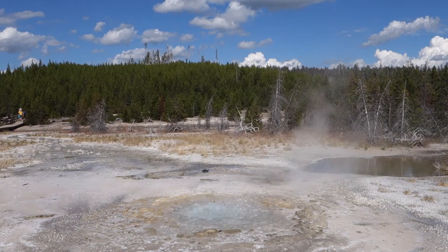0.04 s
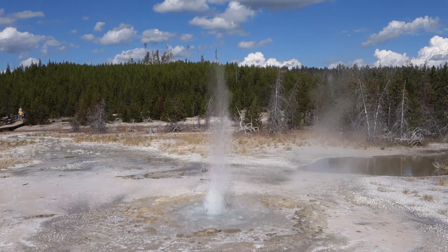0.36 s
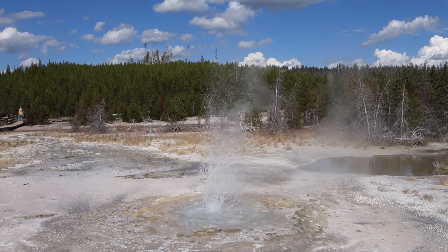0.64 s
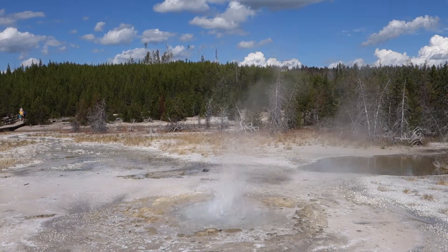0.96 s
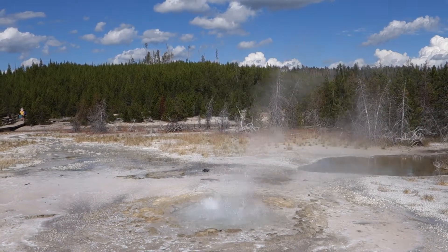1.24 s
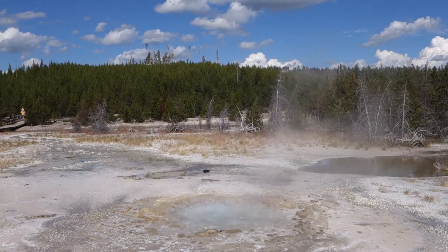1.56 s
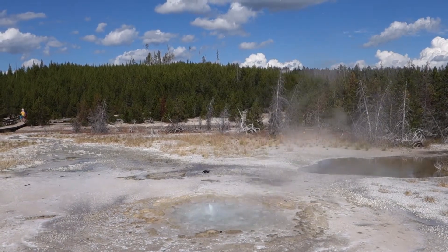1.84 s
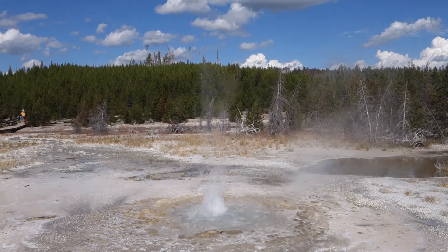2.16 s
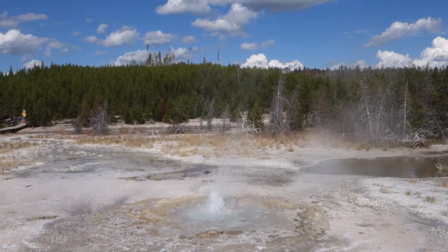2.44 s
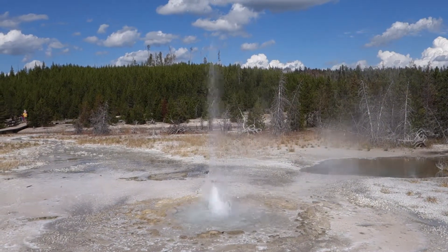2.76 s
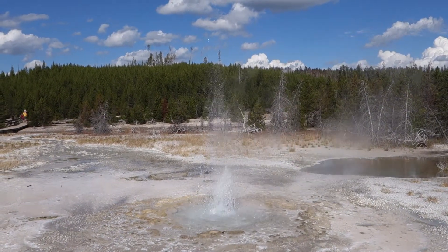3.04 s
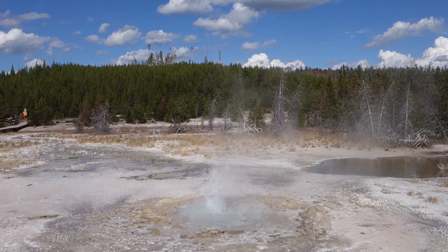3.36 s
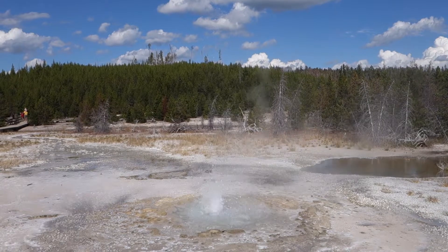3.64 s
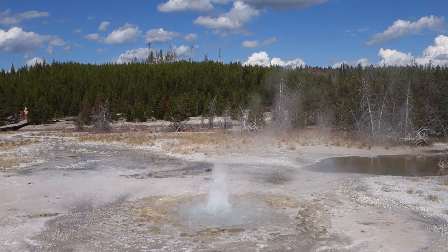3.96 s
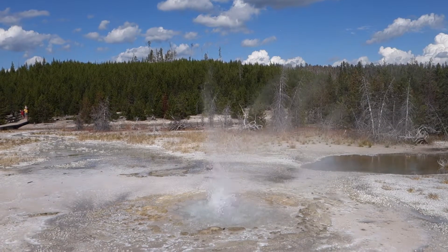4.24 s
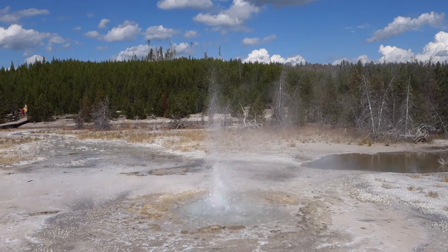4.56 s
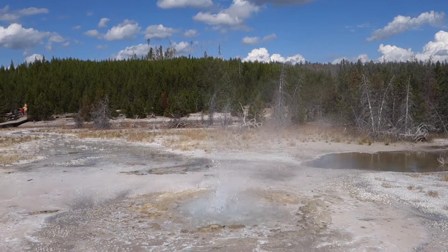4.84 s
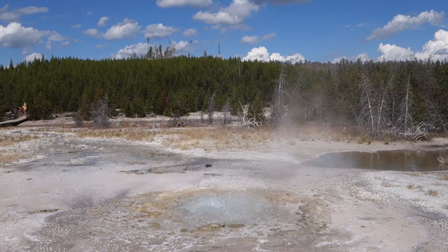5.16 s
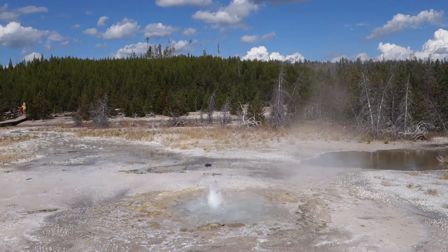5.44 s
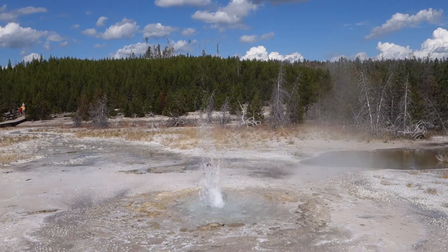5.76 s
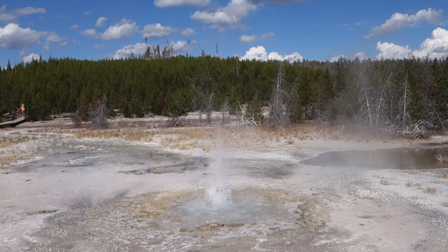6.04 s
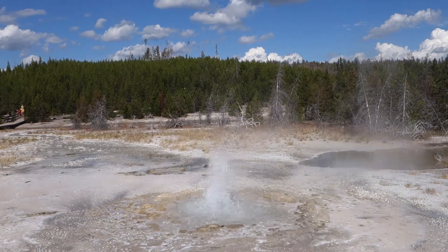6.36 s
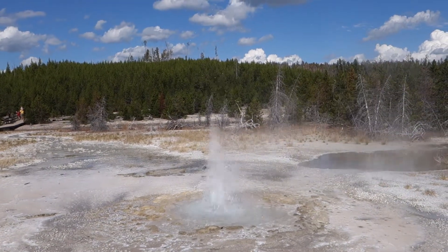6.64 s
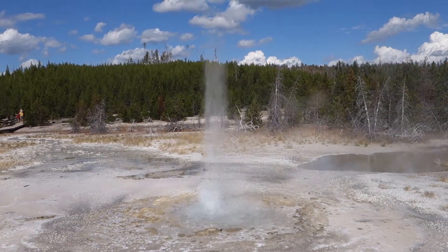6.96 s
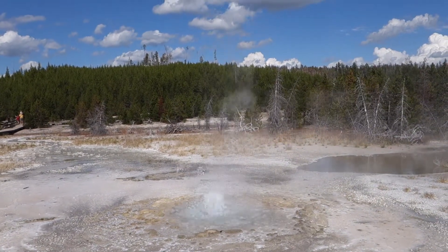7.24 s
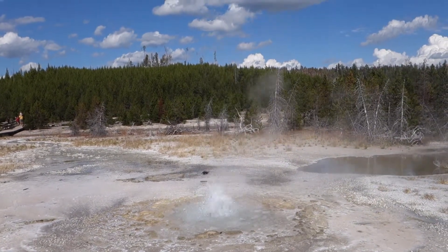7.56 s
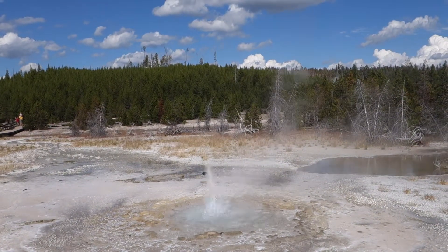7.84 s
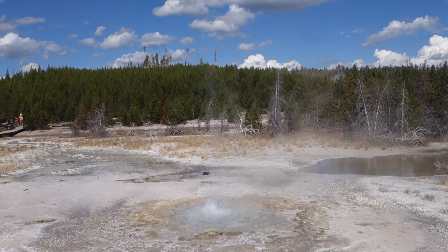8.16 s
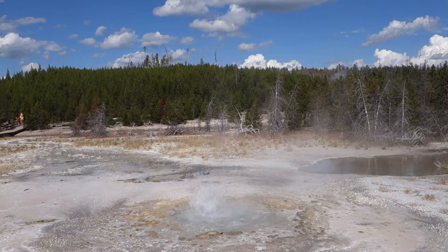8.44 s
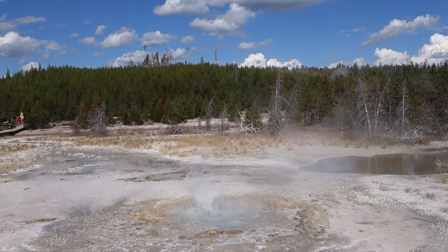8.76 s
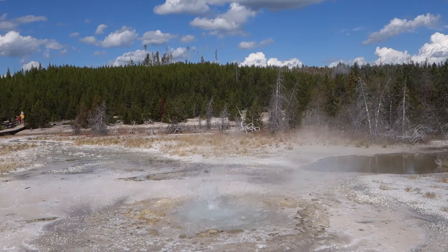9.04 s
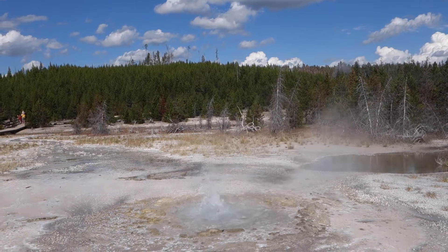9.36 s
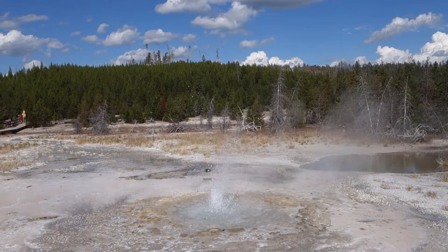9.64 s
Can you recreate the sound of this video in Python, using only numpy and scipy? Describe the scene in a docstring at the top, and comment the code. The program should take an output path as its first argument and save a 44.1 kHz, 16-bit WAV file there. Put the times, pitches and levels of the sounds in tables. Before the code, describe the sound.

A small geyser spurts from a simmering pool across an open, flat basin. Its water falls back in one short shower after another, splashing and pattering with a slightly hollow tone, with scattered plops and a few drops ticking close by. Low wind rumble buffets the microphone at the start, eases briefly, blows hardest through the middle and weakens near the end.

```python
"""Small geyser in the wind

Across an open sinter basin a small geyser spurts from its simmering pool. Thrown water slaps back,
bubbles and patters on the crust; the hard flat ground mirrors every splash a moment later, which gives
it a hollow colour. Single drops land nearer, and wind buffets both ports of the stereo microphone."""
import sys
import numpy as np
from scipy import signal
from scipy.fft import rfft, irfft
from scipy.io import wavfile
from scipy.ndimage import uniform_filter1d

SR = 44100
rng = np.random.default_rng(int(sys.argv[2]) if len(sys.argv) > 2 else 0)


def transcribe(signal):
    """Save signal, clipped to [-1, 1], as a 16-bit WAV file at the path in sys.argv[1]."""
    frames = np.atleast_2d(signal).T
    limited = np.clip(frames, -1, 1)
    pcm = np.round(limited * 32767).astype(np.int16)
    wavfile.write(sys.argv[1], SR, pcm)


N = 436590
TIME, FREQ = np.arange(N) / SR, np.fft.rfftfreq(N, 1 / SR)


def gain_of(db):
    """Decibels to amplitude."""
    return 10 ** (np.asarray(db) / 20)


def unit_rms(x):
    """Scales to rms 1."""
    return x / np.sqrt(np.mean(x ** 2) + 1e-20)


def curve(table, column=1):
    """One column of a table, interpolated onto FREQ over log frequency."""
    columns = np.transpose(table)
    return np.interp(np.log(FREQ + 1), np.log(columns[0] + 1), columns[column])


def filtered(x, response):
    """Filters by a response given on FREQ."""
    return irfft(rfft(x) * response, N)


def wander(hz):
    """Smooth random drift of rms 1, no faster than about hz."""
    return unit_rms(filtered(rng.standard_normal(N), np.exp(-(FREQ / hz) ** 2)))


def band(centres_hz, index):
    """One of a set of overlapping bands that sum to 1."""
    return np.interp(np.log(FREQ + 1), np.log(centres_hz), np.eye(len(centres_hz))[index])


def add(mix, start_s, sound):
    """Mixes a sound in at start_s."""
    part = mix[max(round(start_s * SR), 0):][:len(sound)]
    part += sound[:len(part)]


def steadied(x, low_hz, high_hz, window=4000):
    """Scales x so that one band of it stays at rms 1 over a sliding window of samples."""
    inside = filtered(np.atleast_2d(x).mean(0), (FREQ > low_hz) & (FREQ < high_hz))
    return x / np.sqrt(np.abs(uniform_filter1d(inside ** 2, window)) + 1e-12)


def bursts(rows, rise_s, fall_db_per_s):
    """Power over time of events that rise quickly, hold and die away."""
    power, t = np.zeros(N + SR), np.arange(2 * SR) / SR
    for start_s, hold_s, db in rows:
        age = t + max(-start_s, 0)
        attack = np.minimum(age / rise_s, 1)
        fall_db = fall_db_per_s * np.maximum(age - hold_s, 0)
        add(power, start_s, (attack * gain_of(db - fall_db)) ** 2)
    return power[:N]


def grains(low_hz, high_hz, per_s, cycles, spread_db, glide, pitches=24):
    """Tiny damped rings of random time and size; each falls to 1/e in the given cycles."""
    out, t = np.zeros(N), np.arange(900) / SR
    for hz in np.geomspace(low_hz, high_hz, pitches):
        age = t * hz / cycles
        ring = np.exp(-age) * np.sin(2 * np.pi * cycles * age * (1 + glide * np.minimum(age, 4)))
        size = gain_of(spread_db * np.minimum(rng.exponential(1, N), 4.5)) * rng.choice([-1, 1], N)
        hits = size * (rng.random(N) < per_s / pitches / SR)
        out += np.sqrt(hz) * unit_rms(signal.oaconvolve(hits, ring)[:N])  # even power per Hz
    return unit_rms(out)


# Breeze over the open basin, at the microphone: (time [s], level [dB])
BREEZE_LEVELS = [(0.0, -19.5), (0.6, -47), (1.6, -51), (1.9, -27.5), (3.0, -33.5), (3.4, -24.5),
                 (5.6, -21.5), (6.5, -24.5), (8.0, -24.5), (8.35, -35.5), (9.9, -31.5)]
# Gusts catching the microphone: (start [s], hold [s], level [dB])
MIC_GUSTS = [(-0.04, 0.063, -20), (0.18, 0.063, -19), (0.26, 0.24, -27), (0.66, 0.044, -33.0),
             (0.77, 0.17, -30.5), (0.97, 0.067, -28.5), (1.11, 0.023, -29), (1.31, 0.057, -29.5),
             (1.69, 0.21, -26.5), (2.01, 0.05, -23.5), (2.18, 0.33, -28.5), (2.53, 0.29, -22.5),
             (3.06, 0.073, -21), (3.2, 0.25, -18.5), (3.48, 0.091, -21.0), (3.65, 0.11, -21),
             (3.89, 0.04, -18.5), (4.01, 0.23, -17), (4.36, 0.39, -19.5), (4.81, 0.07, -20.5),
             (5.02, 0.077, -21.5), (5.25, 0.31, -19.5), (5.65, 0.38, -21.5), (6.04, 0.23, -23),
             (6.55, 0.15, -29.5), (6.79, 0.24, -23.0), (7.28, 0.5, -21), (7.85, 0.23, -23.5),
             (8.18, 0.057, -21), (8.35, 0.17, -25.5), (8.56, 0.24, -25.5), (8.91, 0.1, -35),
             (9.19, 0.13, -29), (9.54, 0.15, -28)]
def wind_strength(sway_db=0.9):
    """Buffeting in dB: gusts stand on the breeze, and the whole flow sways unsteadily."""
    breeze = gain_of(np.interp(TIME, *np.transpose(BREEZE_LEVELS))) ** 2
    gusts = bursts(MIC_GUSTS, rise_s=0.026, fall_db_per_s=183)
    return 10 * np.log10(breeze + gusts) + sway_db * wander(hz=12)


# Wind right on the microphone: (frequency [Hz], relative density [dB])
WIND_SPECTRUM = [(15, -32), (25, -27), (45, -9), (70, -3.5), (105, 1.5), (165, -1), (250, -7), (380, -17.5),
                 (550, -26.5), (900, -45), (2000, -72)]
# How alike it is at the two ports: (frequency [Hz], coherence [0-1], left lead [rad])
WIND_COHERENCE = [(50, 1, -0.51), (144, 0.82, 0.1), (276, 0.57, -0.34), (497, 0.6, -1.74)]
def wind(brisk_db=-22, flutter_at_brisk_db=-34, flutter_growth=1.83, rumble_growth=0.5):
    """Eddies at the two ports: a deep rumble and a buffeting follow the gusts, small ones flutter."""
    left, unrelated = rng.standard_normal((2, N))
    coherence = np.clip(curve(WIND_COHERENCE), 0, 1)
    right = filtered(left, coherence * np.exp(-1j * curve(WIND_COHERENCE, column=2)))
    right += filtered(unrelated, np.sqrt(1 - coherence ** 2))
    flow = filtered(np.array([left, right]), gain_of(curve(WIND_SPECTRUM)))
    lumps_db = wander(hz=45)
    small_lumps_db = 3.5 * (lumps_db + wander(hz=45)) / np.sqrt(2)
    large_eddies = steadied(flow * gain_of(lumps_db), 30, 400)
    small_eddies = steadied(flow * gain_of(small_lumps_db), 280, 520, window=9000)
    # the largest eddies swell less than the gust itself; the smallest swell more, and come and go
    gust_db = wind_strength()
    rumble_db = gust_db.mean() + rumble_growth * (gust_db - gust_db.mean())
    flutter_db = flutter_at_brisk_db + flutter_growth * (gust_db - brisk_db) + 2 * wander(hz=12)
    deep, low, mid, high = (band([61, 130, 245, 378], k) for k in range(4))
    rumble = filtered(large_eddies, deep) * gain_of(rumble_db)
    buffet = filtered(large_eddies, low + mid / 2) * gain_of(gust_db)
    flutter = filtered(small_eddies, mid / 2 + high) * gain_of(flutter_db)
    return rumble + buffet + flutter


# Single eddies striking the microphone: (time [s], relative level [dB], centre [Hz])
EDDY_THUMPS = [(0.082, -6, 149), (1.734, -11.5, 109), (1.844, -6.5, 107), (1.907, -17, 220),
               (2.042, -12, 201), (2.22, -8.5, 151), (3.258, -12.5, 150), (3.361, -7, 150),
               (4.56, -11, 200), (3.75, -16, 260), (4.854, -7.5, 130), (5.32, -15, 150), (7.317, -23, 130),
               (7.605, -5, 267), (9.016, -15, 100), (9.227, -11, 130)]
def thumps(level_db=-3.5, cycles=0.64, phase_spread_rad=0.32):
    """One eddy crossing the ports is a pressure swing of a cycle or two, a little different at each."""
    out, t = np.zeros((2, N)), np.arange(-1200, 1200) / SR
    for time_s, db, hz in EDDY_THUMPS:
        phase, *port_offsets = rng.standard_normal(3)
        envelope = gain_of(db + level_db) * np.exp(-(t * hz / cycles) ** 2)
        for channel, offset in zip(out, port_offsets):
            swing = np.cos(2 * np.pi * (hz * t + phase) + phase_spread_rad * offset)
            add(channel, time_s + t[0], envelope * swing)
    return out


def simmer(level_db=-54.0):
    """Large bubbles keep up a low gurgle in the pool."""
    gurgle = grains(180, 607, per_s=580, cycles=3.8, spread_db=7.0, glide=0.0079, pitches=10)
    return gain_of(level_db) * gurgle


# Stray droplets landing close to the microphone: (time [s], relative peak [dB], centre [Hz])
NEAR_DROPS = [(1.4645, -14, 8500), (1.576, -24, 6500), (1.651, -21, 8000), (1.705, -22, 5500),
              (1.76, -23, 8000), (1.8697, -22.5, 6000), (3.764, -24, 4170), (4.3117, -15, 5340),
              (5.3406, -18.5, 3360), (5.4175, -19.5, 5340), (5.7396, -20.5, 8100), (5.9182, -24, 6500),
              (6.769, -19, 6000), (6.88, -19, 5900), (7.8714, -22, 4000), (8.312, -25, 8100),
              (9.1515, -22, 7640), (9.5535, -16, 4850)]
def drops(level_db=4.5, splatter=0.086, splatter_s=0.0085, cycles=0.48, pan_spread=0.24):
    """Each droplet is one sharp tick with a short splatter behind it, a little left or right."""
    out, t = np.zeros((2, N)), np.arange(800) / SR
    for time_s, db, hz in NEAR_DROPS:
        impact = (t == 0) + splatter * rng.standard_normal(len(t)) * gain_of(-60 * t / splatter_s)
        ring = np.exp(-t * hz / cycles) * np.sin(2 * np.pi * hz * t)
        tick = signal.fftconvolve(impact, ring)[:len(t)]
        tick *= gain_of(db + level_db) / abs(tick).max()
        pan = pan_spread * rng.standard_normal()
        add(out[0], time_s, (1 + pan) * tick)
        add(out[1], time_s, (1 - pan) * tick)
    return out


# Bounce off the flat ground between pool and microphone: (frequency [Hz], reflection [factor])
GROUND_MIRROR = [(300, 0.2), (1600, 0.75), (2600, 0.27), (4000, 0.37), (6000, 0.077), (10000, 0.022)]
# Scatter from the crust all around: (frequency [Hz], level re direct [dB])
CRUST_SCATTER = [(300, -23), (1200, -9), (2600, -8.5), (5500, -4.5), (11000, -1)]
def basin(x, ground_delay_s=0.001534, height_sway=0.011, scatter_s=0.044, patches=6):
    """Direct sound, its mirror image in the flat ground, and a short scatter off the rough crust."""
    mirror = np.clip(curve(GROUND_MIRROR), 0, 1)
    delay_s = ground_delay_s * (1 + height_sway * wander(hz=13.4))  # splashes sit higher or lower
    image = np.interp(TIME - delay_s, TIME, filtered(x, mirror))
    hollow = filtered(x + image, 1 / np.sqrt(1 + mirror ** 2))
    # each moment's water lands on another patch, with its own scatter paths
    t = np.arange(3000) / SR
    tails = rng.standard_normal((patches, 2, len(t))) * gain_of(-60 * t / scatter_s)
    tails /= np.linalg.norm(tails, axis=2, keepdims=True)
    shares = np.array([wander(hz=36) for _ in tails])
    shares /= np.linalg.norm(shares, axis=0)
    feeds = shares * (hollow + x) / 2
    scattered = sum(signal.oaconvolve(feed[None], tail, axes=1) for feed, tail in zip(feeds, tails))
    return hollow + filtered(scattered[:, :N], gain_of(curve(CRUST_SCATTER)))


# The geyser at the two microphone ports: (frequency [Hz], left minus right [dB], left lead [rad])
PORT_SHADING = [(610, 0.5, -0.13), (2160, 0.5, 0.36), (2940, -1, -1.18), (3340, -4.5, 0.059),
                (5400, -1.5, 0.019), (6500, 2, -0.13), (8800, 2, 0.0094), (11000, 1.5, -0.61)]
def ports(x):
    """The housing shades and delays each microphone port differently."""
    side = np.array([[0.5], [-0.5]])
    shade = gain_of(side * curve(PORT_SHADING))
    phase = side * curve(PORT_SHADING, column=2)
    return filtered(x, shade * np.exp(1j * phase))


# Lumps of water hitting the pool across the basin:
# (time [s], level [dB], cavity pitch [Hz], spatter re ring [factor])
POOL_SLAPS = [(0.037, -25.5, 740, .8), (.6505, -21, 740, 0.44), (0.776, -25.5, 1330, .6),
              (1.0125, -24, 3020, 1), (1.1692, -22, 2530, 0.65), (1.5266, -24.5, 2300, .8),
              (2.39, -23.5, 740, .4), (2.5385, -22.5, 720, .4), (4.0648, -26, 725, .5),
              (4.1535, -25, 720, .5), (4.41, -24.5, 1250, 0.35), (4.581, -17.5, 1260, 0.32),
              (5.127, -27, 3140, 0.95), (5.2195, -22.5, 706, .6), (6.2188, -27, 2750, .6),
              (6.297, -16, 750, 0.36), (8.312, -27.5, 1300, .8), (8.672, -22, 740, 0.43),
              (8.707, -24.5, 746, 0.37), (9.4642, -30.5, 1350, 0.94), (9.554, -25, 730, .4)]
def slaps(ring_s=0.015, spatter_s=0.022, glide_per_s=3.6):
    """A lump of water opens a cavity that rings briefly upward, inside a short burst of spatter."""
    out, t = np.zeros(N), np.arange(3000) / SR
    for time_s, db, hz, spatter_gain in POOL_SLAPS:
        cavity = np.sin(2 * np.pi * hz * t * (1 + glide_per_s * t)) * gain_of(-60 * t / ring_s)
        bandpass = signal.butter(2, [550, hz + 1000], "band", fs=SR, output="sos")
        fizz = unit_rms(signal.sosfilt(bandpass, rng.standard_normal(len(t))))
        spatter = spatter_gain * fizz * gain_of(-60 * t / spatter_s)
        add(out, time_s, gain_of(db) * (cavity + spatter))
    return out


# The vent across the basin heaves up slugs of water: (start [s], hold [s], gulp level [dB])
VENT_SPURTS = [(0.23, 0.13, -39), (0.65, 0.059, -35), (0.94, 0.06, -37), (2.38, 0.03, -33.5),
               (2.55, 0.06, -39), (2.83, 0.07, -38), (4.38, 0.14, -41), (4.68, 0.087, -39.5),
               (5.19, 0.051, -39), (5.41, -0.0, -36), (5.72, 0.08, -37.5), (6.26, 0, -30.5),
               (6.88, 0.074, -38), (7.04, 0.18, -39), (7.41, 0.096, -36.5), (7.82, 0.039, -36.5),
               (8.64, 0.13, -40.5), (9.52, 0.13, -39.5)]
# Thrown water raining back on pool and crust:
# (start [s], length [s], splash level [dB], heavy water re splash [dB], spray re splash [dB])
FALLING_SHOWERS = [(-0.11, 0.49, -42, -0.5, -7.5), (0.364, 0.61, -50, 8.5, -3.5),
                   (0.766, 0.7, -38, 1, -5.5), (1.052, 0.79, -43.5, -0.5, -3.5), (1.822, 0.36, -47, 4, 1),
                   (2.1, 0.85, -43, 4, -5.5), (2.811, 0.61, -40, 2, -4.5), (3.37, 0.77, -40, 1.5, -8),
                   (3.848, 1.11, -44, 4.5, -4.5), (4.686, 0.6, -39, -2.5, -7.5), (5.158, 0.62, -48, 7, -5),
                   (5.692, 0.45, -47, 6, -2.5), (5.967, 0.95, -38, 2, -6), (6.745, 0.37, -39.5, 2.5, -4.5),
                   (7.057, 0.93, -39.5, 0.5, -5), (7.622, 0.55, -41, 1.5, -9.5),
                   (8.182, 0.4, -45.5, 3, -8.5), (8.57, 0.43, -43.5, 0.5, -5.5),
                   (8.997, 0.42, -45.5, 4, -5), (9.25, 0.69, -45.5, 0, -4.5)]
# The pool's constant seething: (heavy water [dB], splash [dB], spray [dB])
POOL_SEETHE = (-50.5, -52.5, -60.5)
def water_levels(splash_re_gulp_db=-12, spray_re_gulp_db=-18, arch_exponent=0.93, surge_db=0.86):
    """Amplitudes of heavy water, splash and spray: spurts gulp, showers swell and thin in an arch."""
    jet = bursts(VENT_SPURTS, rise_s=0.024, fall_db_per_s=154)
    power = np.outer(gain_of([0, splash_re_gulp_db, spray_re_gulp_db]) ** 2, jet)
    power += gain_of(POOL_SEETHE)[:, None] ** 2
    for start_s, length_s, db, heavy_db, spray_db in FALLING_SHOWERS:
        age = np.arange(max(-start_s, 0), length_s, 1 / SR)
        arch = np.abs(np.sin(np.pi * age / length_s)) ** arch_exponent
        for layer, layer_db in zip(power, (db + heavy_db, db, db + spray_db)):
            add(layer, start_s, arch * gain_of(layer_db) ** 2)
    return np.sqrt(power) * gain_of(surge_db * wander(hz=9))


def clumps(per_s, fall_s):
    """Level swings of rms 1: each landing clump of water starts at once and dies away."""
    landings = (rng.random(N) < per_s / SR) * rng.uniform(0.72, 1, N)
    swing = signal.lfilter([1], [1, -np.exp(-1 / (fall_s * SR))], landings)
    return unit_rms(swing - swing.mean())


# Colour of the water at the pool, before each band is levelled: (frequency [Hz], density [dB])
SPLASH_SPECTRUM = [(100, -13), (330, -3.5), (600, 5.5), (850, 5), (1300, -1), (1650, -4), (2000, -8),
                   (2600, -7.5), (3400, -10), (4500, -12), (6000, -12.5), (8700, -12.5), (10800, -17.5)]
def fountain(bubble_db=-14.0, wash_db=2.0):
    """Bubbles, drop impacts and a fine wash, arriving in clumps as the jet breaks up and falls."""
    bubbles = grains(448, 2990, per_s=1100, cycles=2.85, spread_db=3.0, glide=0.021)
    patter = grains(1460, 11400, per_s=3000, cycles=0.88, spread_db=4.0, glide=0)
    water = gain_of(bubble_db) * bubbles + patter + gain_of(wash_db) * rng.standard_normal(N)
    water = filtered(water, gain_of(curve(SPLASH_SPECTRUM)))
    levels = water_levels()
    shared_clumps = clumps(per_s=130, fall_s=0.008)
    heavy, splash, spray = (600, 1500, -2.0, 2.0), (1800, 4500, 0.5, 1.5), (5000, 11000, -1.5, 1.0)
    out = np.zeros(N)
    for k, (low_hz, high_hz, trim_db, clump_db) in enumerate((heavy, splash, spray)):
        swing = (shared_clumps + clumps(per_s=90, fall_s=0.023)) / np.sqrt(2)
        clumped = steadied(water * gain_of(clump_db * swing), low_hz, high_hz)
        out += filtered(clumped, band([1100, 2800, 6500], k)) * levels[k] * gain_of(trim_db)
    return out


def scene():
    """The geyser and its pool across the basin, droplets nearby, and wind right on the microphone."""
    geyser = ports(basin(fountain() + slaps()) + simmer())
    return geyser + drops() + wind() + thumps()


def record(dry, cutoff_hz=11050):
    """The microphone rounds off the hardest gusts; the recorder cuts the top of the treble."""
    lowpass = signal.firwin(511, cutoff_hz, window=("kaiser", 9), fs=SR)
    return signal.oaconvolve(np.tanh(dry), lowpass[None], "same")


dry = scene()
out = record(dry)
transcribe(out)
```